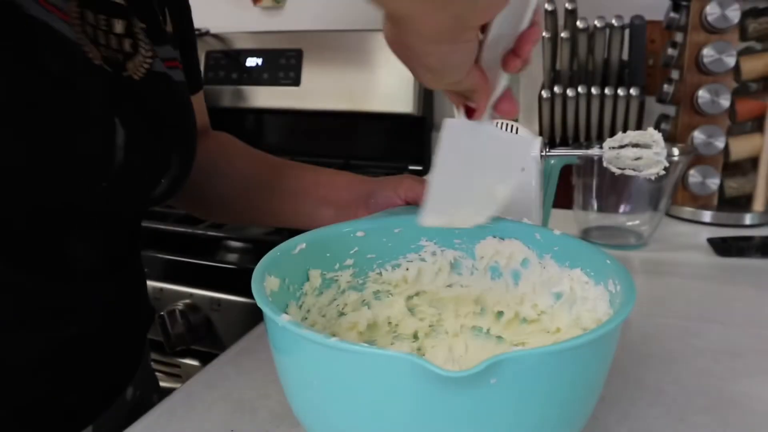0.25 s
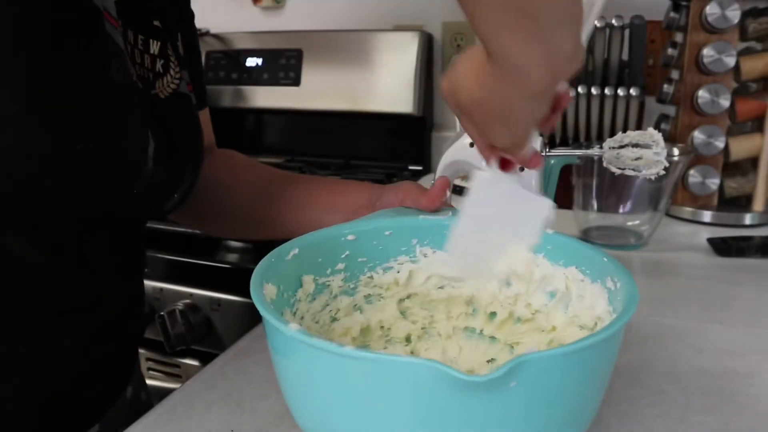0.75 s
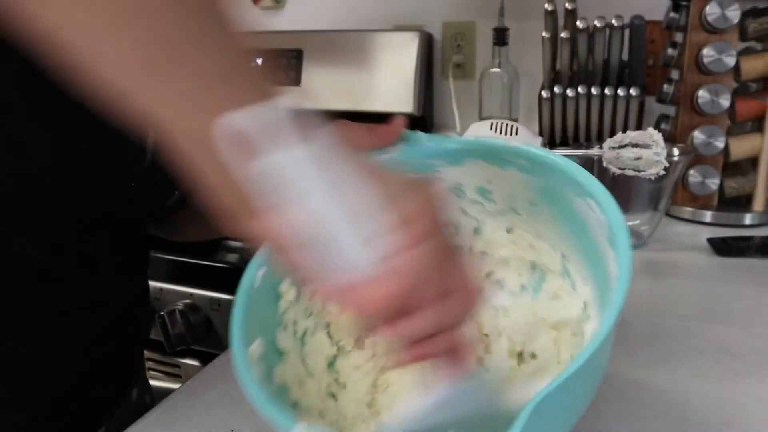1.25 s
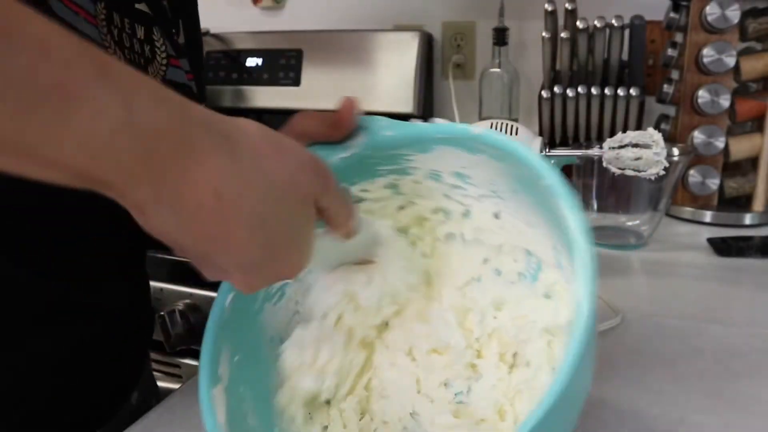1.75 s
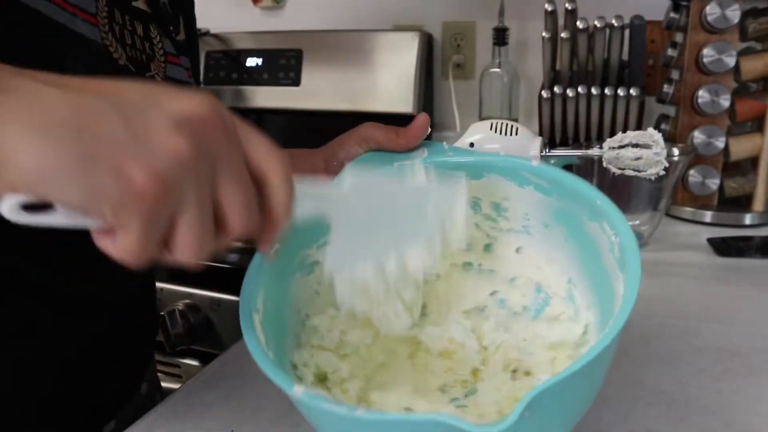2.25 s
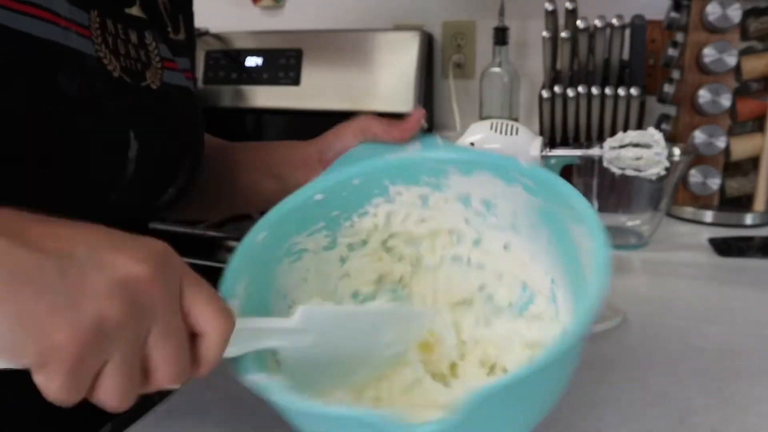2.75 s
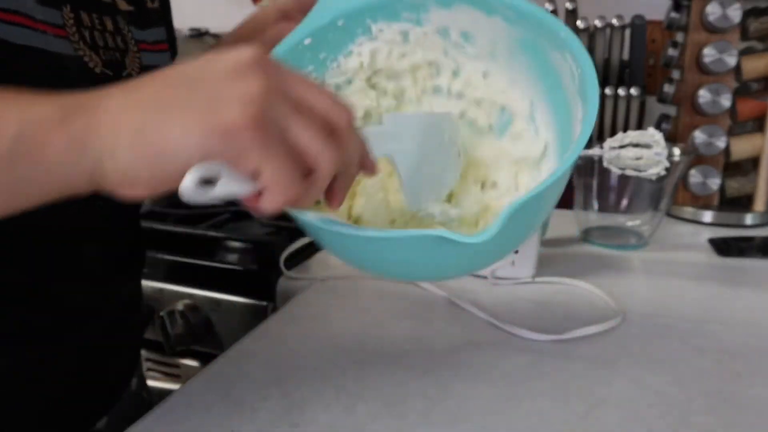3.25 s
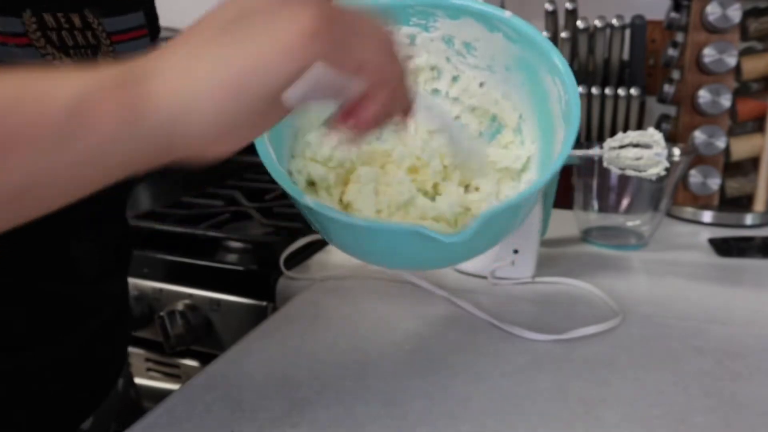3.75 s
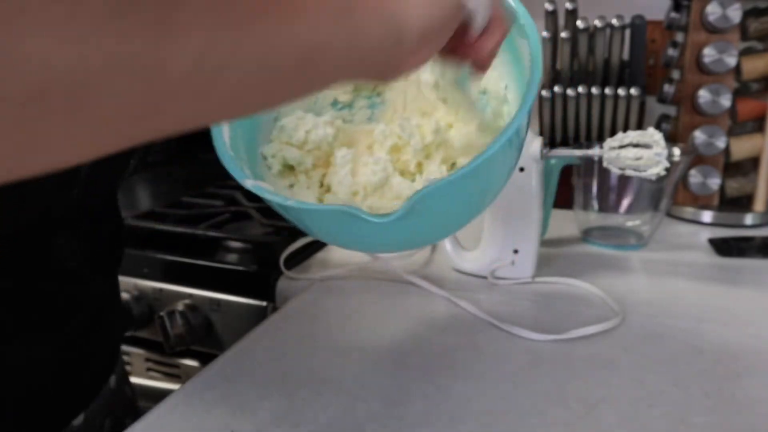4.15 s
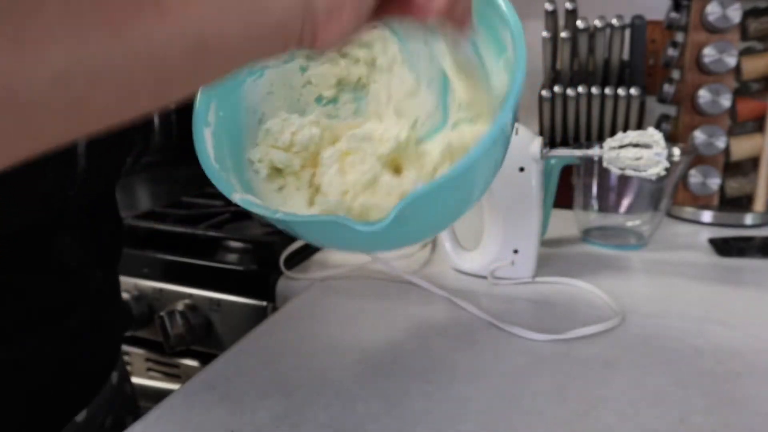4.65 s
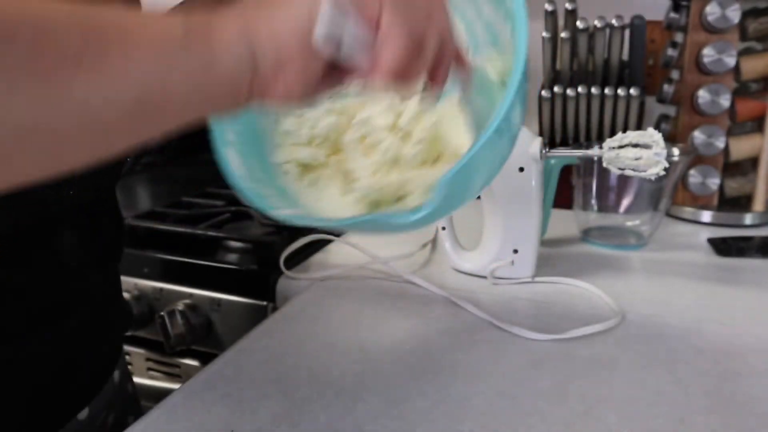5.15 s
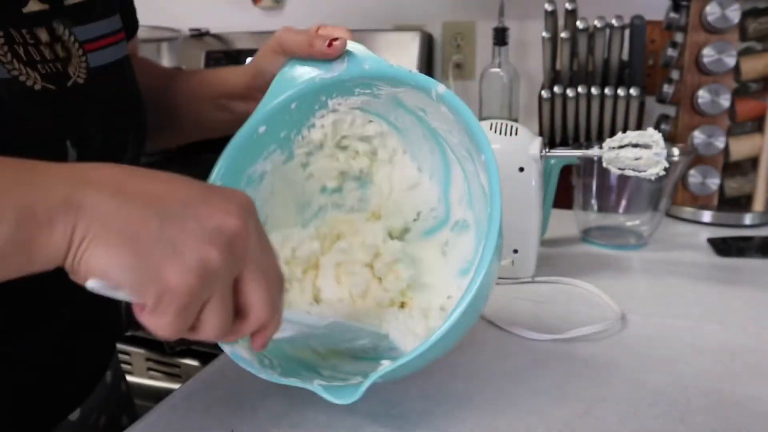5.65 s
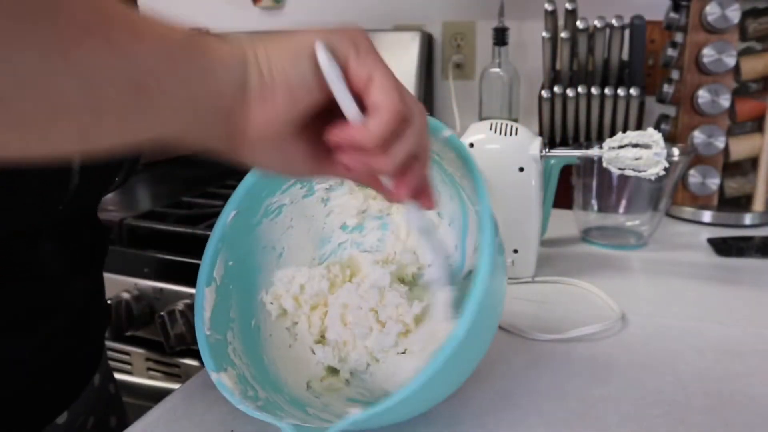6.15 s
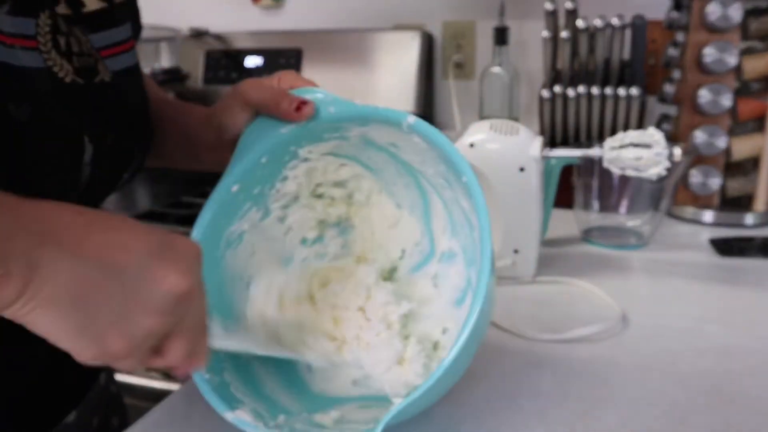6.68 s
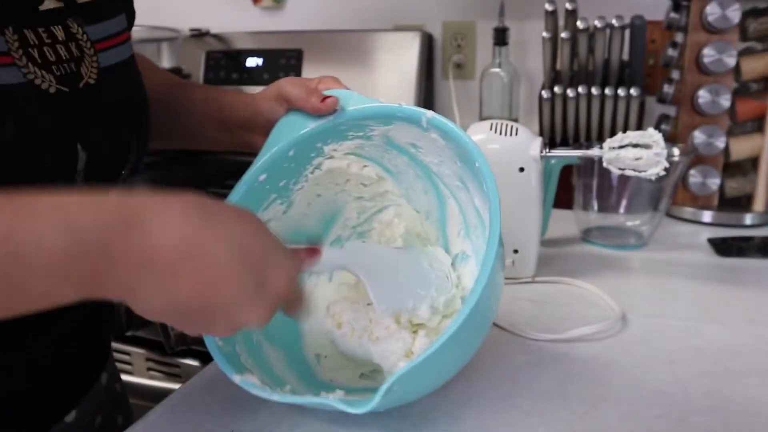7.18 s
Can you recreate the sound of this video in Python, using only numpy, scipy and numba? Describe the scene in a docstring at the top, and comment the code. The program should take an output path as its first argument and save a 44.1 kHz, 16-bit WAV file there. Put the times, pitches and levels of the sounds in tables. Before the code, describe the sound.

Close, lightly echoing kitchen sound, with a faint low appliance rush and wavering hum throughout. A soft bump opens it; at 0.5 s the spatula taps the plastic bowl. From 0.8 to 1.5 s a grainy, mid-pitched rasp sweeps the wall with wet frosting hiss, strongest near 1.4, while the base judders lowly on the counter around 1.2. Small pushes and light taps follow to 2.1. Two loud, hard rim raps clatter at 2.4 and 2.65, each with a thud; the background dips and creeps back. After a lull, taps at 3.9 and 4.5 frame short scrapes near 4.0 and 4.6 and soft, wet smears. A tap and lighter sweep run 5.0-5.5. At 5.8 the bowl thumps down with a tiny dry chirp. The strongest raspy scrape builds from 6.2, peaking 6.6-6.85 with firm knocks and low bumps, then fades into faint smearing by 7.4.

```python
"""In a small kitchen, close to a camera, a spatula works thick frosting round a plastic bowl.
The blade's stick-slip is random grains through gliding resonances, with wet hiss and a ringing bowl wall.
Taps on the wall and two raps on the rim mix noise bursts with ringing modes; the bowl drags, bumps and chirps.
An appliance rushes and hums behind, from shaped noise and wavering sine lines.
The camera's gain control ducks at the hard blows and creeps back."""
import sys
import numpy as np
from scipy import signal
from scipy.fft import rfft, irfft
from scipy.io import wavfile
from scipy.ndimage import uniform_filter1d
from numba import njit

SR = 44100
rng = np.random.default_rng(int(sys.argv[2]) if len(sys.argv) > 2 else 0)


def to_wav(s):
    """Save 16-bit WAV."""
    ch = np.atleast_2d(s).T  # columns
    pcm = np.round(np.clip(ch, -1, 1) * 32767)  # PCM
    wavfile.write(sys.argv[1], SR, pcm.astype(np.int16))


N = 327222
T = np.arange(N) / SR  # time [s]

# long sweeps of the blade round the wall, one curve each: (time [s], rub level [dB], rub centre [Hz])
SWEEPS = [
    [(0.78, -55, 2270), (0.794, -27.5, 2230), (0.89, -26, 2350), (0.976, -28, 2150), (1.06, -29.5, 1980),
     (1.17, -28, 1870), (1.21, -24, 2270), (1.275, -28, 2020), (1.322, -27.5, 2400), (1.345, -22, 2430),
     (1.4, -21.5, 2400), (1.442, -35.5, 2220), (1.494, -46.5, 2070), (1.56, -55, 2310)],
    [(4.98, -34, 2400), (4.995, -32, 2400), (5.075, -28.5, 2140), (5.112, -35, 1980), (5.192, -34, 1940),
     (5.226, -33.5, 1900), (5.302, -37.5, 1790), (5.316, -28, 1830), (5.354, -42, 1910), (5.418, -50, 2000),
     (5.448, -42, 2010), (5.56, -59, 1840)],
    [(6.14, -48.5, 1860), (6.29, -36, 2140), (6.37, -35, 1950), (6.435, -27.5, 2050), (6.46, -33, 1950),
     (6.525, -25, 1760), (6.566, -23.5, 2100), (6.588, -24.5, 2200), (6.606, -22, 2140),
     (6.67, -19.5, 2300), (6.718, -19, 2080), (6.748, -19.5, 2010), (6.776, -20.5, 2200),
     (6.802, -18.5, 2240), (6.846, -23.5, 2060), (6.864, -32.5, 2150), (6.938, -46, 1930),
     (6.974, -33, 2200), (6.992, -46, 2370), (7.08, -74, 2150)],
]
# wet hiss of the frosting in each sweep, before HISS_DB: (time [s], relative level [dB])
SMEARS = [
    [(0.775, -74), (0.793, -47.5), (0.823, -53.5), (0.903, -44.5), (1.049, -60.5), (1.159, -56),
     (1.209, -44), (1.257, -48.5), (1.385, -38), (1.469, -60.5), (1.56, -68)],
    [(4.97, -71), (4.978, -50), (5.024, -54.5), (5.078, -46), (5.096, -50.5), (5.16, -59), (5.3, -59.5),
     (5.32, -55), (5.36, -64), (5.532, -86), (5.56, -74)],
    [(6.17, -74), (6.22, -57), (6.338, -59), (6.6, -51.5), (6.676, -42), (6.73, -48.5), (6.834, -47.5),
     (6.878, -60.5), (6.98, -56), (6.988, -63), (7.08, -66)],
]
# short pushes through the frosting, hiss and wall against the rub:
# (peak time [s], rise [s], fade [s], rub level [dB], rub centre [Hz], hiss [dB], bowl wall [dB])
PUSHES = [(0.59, 0.24, 0.55, -49.5, 2100, -15.5, 2.5), (0.75, 0.071, 0.13, -47.5, 1950, -14, -9),
          (1.613, 0.11, 0.13, -40, 2400, -16, -7), (2.11, 0.3, 0.21, -58, 2177, -5.5, -12),
          (3.902, 0.004, 0.043, -38, 1980, -34, 15), (4.003, 0.07, 0.067, -20.5, 2190, -22, -19),
          (4.062, 0.056, 0.063, -25, 2230, -18, -6), (4.11, 0.1, 0.13, -40.5, 1800, -28, 10),
          (4.205, 0.071, 0.055, -36, 1550, -27, 4.5), (4.233, 0.08, 0.022, -31.5, 1940, -30, -5.5),
          (4.29, 0.34, 0.75, -64, 1840, -1.5, 8), (4.488, 0.0072, 0.029, -49, 2000, -25, 15),
          (4.596, 0.07, 0.074, -22, 2300, -16, -25), (4.711, 0.49, 0.14, -37.5, 1870, -23, 2.5),
          (6.214, 0.045, 0.081, -34, 1950, -27, -10), (6.975, 0.054, 0.018, -28, 2060, -25, -23.5),
          (7.359, 0.35, 0.28, -56.5, 2210, -10, -15)]
# resonances of the blade: (multiple of the rub centre [ratio], level [dB], width [Hz])
BLADE_MODES = [(1, 0, 414), (1.25, -0.75, 427), (1.47, -5.5, 654)]
# tone of the rasping edge: (frequency [Hz], level [dB])
RUB_TONE = [(300, -39.5), (700, -21), (950, 1.5), (1200, 9.5), (1500, 0.5), (1950, 1), (2400, -3),
            (2700, -1), (3300, -4.5), (4200, -8.5), (6000, -22), (12000, -55)]
# tone of the smearing frosting: (frequency [Hz], level [dB])
HISS_TONE = [(2500, -17), (4000, -3.5), (5400, -0.5), (7200, -4.5), (9200, -7), (11000, -21), (15000, -41)]
# frosting parts from the blade with a small smack: (time [s], level before its tone [dB])
SMACKS = [(1.595, -49), (2.13, -46), (4.843, -47), (4.891, -48), (5.323, -38), (6.976, -44)]
# tone of the smacks: (frequency [Hz], level [dB])
SMACK_TONE = [(1500, 13), (4000, -2), (9500, 0), (14000, -17)]
# the blade taps the wall; the row at 5.8228 s is the click of the bowl set down on the counter: # (time [s],
# force [dB], ringing centre [Hz], ringing width [Hz], bowl ring [dB], crack [dB])
TAPS = [(0.4785, -9.5, 1770, 2600, -11.5, -11), (0.579, -35, 2520, 900, 4, -3),
        (0.789, -24, 2400, 2000, 1, -20), (1.245, -16.5, 2200, 1200, 2, -21),
        (1.627, -26.5, 1300, 500, 8.5, -25), (1.9932, -28.5, 2130, 3010, -1.5, -6),
        (3.8990, -9, 2200, 1900, -3, -36), (4.237, -18, 1430, 900, -1, -26),
        (4.278, -43, 2500, 1510, -4, 3), (4.4841, -6.5, 1920, 2000, -4, -8.5),
        (4.4870, -10, 2480, 900, -7, -20), (4.557, -18, 2400, 900, 5, -30),
        (4.9793, -11.5, 2370, 700, 2, -11), (5.3125, -16, 1880, 890, 2.5, -12),
        (5.8228, -18.5, 1520, 3000, 5.5, -15), (6.142, -30, 1620, 2000, 0, -27),
        (6.282, -19, 2100, 1010, 4, -25), (6.623, -8, 2150, 500, -7, -28), (6.7171, -5, 1730, 500, -5, -27),
        (6.7998, -3.5, 2650, 700, -3, -36)]
# tone of the whole tap: (frequency [Hz], level [dB])
TAP_TONE = [(100, 10.5), (3500, 2.5), (5000, -11), (9500, -9.5), (11500, -26), (15000, -44)]
# ring of the loaded bowl: (frequency [Hz], level [dB], t60 [s])
BOWL_MODES = [(144, -9.5, 0.068), (246, -25.5, 0.18), (323.5, -16, 0.21), (367, -12.5, 0.11),
              (534, 2, 0.02), (616, 3.5, 0.034), (654, 3.5, 0.013), (890, 3.5, 0.009), (1163, 1.5, 0.067),
              (1193, -1, 0.073), (1650, -17.5, 0.051), (1723, -0.5, 0.06), (1853, -1.5, 0.18),
              (1980, -5, 0.024), (2150, 2, 0.03), (2400, -2.5, 0.018), (2560, 10, 0.038), (2980, 1, 0.048),
              (3070, -13, 0.025), (3450, -2, 0.078), (3810, 8, 0.037), (4280, -28, 0.0066),
              (5000, -22.5, .007), (5700, -56, .006)]
# the spatula is rapped on the rim:
# (time [s], force [dB], clatter decay to 1/e [s], handle's note [Hz], handle level [dB])
RAPS = [(2.3871, 1, 0.0043, 1910, -13), (2.6534, 3.5, 0.0043, 2913, -2)]
# tone of the rap's clatter: (frequency [Hz], level [dB])
CLATTER_TONE = [(100, 0.5), (370, 13), (900, 10), (1400, 7.5), (2300, 11), (3500, 0.5), (4500, -7),
                (6300, -12), (9500, -20), (11500, -33), (15000, -41)]
# ring of the rim: (frequency [Hz], level [dB], t60 [s])
RIM_MODES = [(524.6, 0, 0.035), (600, 0, 0.044), (749, -7.5, 0.055), (923, -7.5, 0.049),
             (1133, -1.5, 0.029), (1187, -1, 0.05), (1414, -14, 0.037), (1640, -12.5, 0.039),
             (1980, -10.5, 0.032), (2200, -15.5, 0.042), (2405, -16.5, 0.022), (2775, -13.5, 0.03),
             (3430, -25, 0.03)]
# the bowl's base dragged over the counter: (time [s], relative level [dB])
DRAG = [(0.98, -50), (1.055, -32), (1.11, -27), (1.178, -23), (1.256, -34), (1.46, -51)]
# the bowl meets the counter: (time [s], force [dB], low-pass corner of the thud [Hz])
BUMPS = [(0.004, -20, 340), (0.479, -29, 900), (2.3888, -4.5, 445), (2.6564, -4.5, 420), (5.8225, -1, 600),
         (6.142, -25, 900), (6.52, -11, 376), (6.718, -13.5, 484), (6.834, -24, 910), (6.881, -19.5, 460)]
# boom of bowl and counter together: (frequency [Hz], level [dB], t60 [s])
COUNTER_MODES = [(69.6, -2.5, 0.19), (145.1, 7.5, 0.077), (164.6, 2, 0.11), (238, -0.5, 0.067),
                 (280, -10.5, 0.13), (328, -5.5, 0.067), (427.5, -6.5, 0.043), (500, 5, 0.018),
                 (736, -33, 0.058)]
# the base chirps as it settles: (time [s], relative level [dB], lower note [Hz])
CHIRPS = [(5.8464, -18.5, 4500), (5.8603, -14.5, 4200)]
# width between the two microphones: (frequency [Hz], side minus mid [dB])
WIDTH = [(60, -32.5), (200, -24.5), (500, -15.5), (2000, -13.5), (2900, -9), (4000, 2), (12000, 2.5)]
# tone of the kitchen echo: (frequency [Hz], level [dB])
ROOM_TONE = [(50, 4.5), (150, -5.5), (600, -3.5), (1200, -2.5), (2400, -3.5), (3900, 1), (5200, -4),
             (7000, -14), (10000, -8)]
# decay of the kitchen echo: (frequency [Hz], t60 [s])
ROOM_T60 = [(125, 0.28), (1000, 0.42), (2500, 0.54), (6000, 0.33), (10000, 0.24)]
# tone of the appliance's rush: (frequency [Hz], level [dB])
RUSH_TONE = [(15, -43.5), (25, -22.5), (54, -4.5), (87, -12), (151, -6.5), (187, -6.5), (326, -7.5),
             (425, -13.5), (569, -7), (649, -16), (1020, -17), (1100, -18), (1970, -21.5), (9170, -54),
             (14000, -65)]
# width of the rush: (frequency [Hz], side minus mid [dB])
RUSH_WIDTH = [(100, -21.5), (600, -10.0), (2000, -6.0), (5000, 7.0)]
# appliance hum lines: (mean frequency [Hz], mean rms level [dB])
HUM = [(59.6, -49.5), (119, -51.5), (145.3, -46.5), (161.5, -49), (274.5, -55.5), (535, -54), (586.8, -53),
       (1055, -62)]

HISS_DB, EDGE_DB = 1, 1.1  # trims of the sweeps' hiss and of the whole edge rasp
FIRM_DB = -25  # rub level of a firm, steady sweep
WALL_DB, WALL_DB_PER_DB = -41, 0.24  # the wall rings almost as much under a light sweep as under a firm one
PUSH_DROP_DB = 23.5  # a push rises and fades by this much in its rise and fade times
STEADY, STEADY_S = 0.37, 0.012  # even hand: share of the chance dB swings taken out, window [s]
FLUTTER_DB, FLUTTER_S = -12, 0.0092  # the blade chatters briefly where it lands: level, decay to 1/e [s]
SOFT_TOP = 1.3  # the soft blade stirs the bowl only up to this multiple of its own note
PING, PING_S = 0.48, 0.002  # the blade's own note in a tap: strength, decay to 1/e [s]
HANDLE_T60_S = 0.017
RAP_RISE_S = 0.00034  # the clatter builds as the rim gives way
TAP_ROOM_DB, STIR_ROOM_DB = -5.5, -12  # how much of each reaches the room, against a hard knock
CHIRP_ROOM_DB = -16  # the bowl covers its own base
RUSH_DB = -41.0
TOP_HZ = 15100  # upper edge of the finished sound


def undb(db):
    """Decibels to gain."""
    return 10 ** (np.asarray(db) / 20)


def unit(x):
    """Scale to rms 1."""
    return x / np.sqrt(np.mean(x ** 2))


def lookup(points, hz):
    """Read (frequency [Hz], value) points on a log-frequency axis."""
    f, v = np.transpose(points)
    return np.interp(np.log(np.maximum(hz, 1)), np.log(f), v)


def colour(x, points):
    """Shape a sound by a tone table; the minimum-phase filter keeps attacks sharp."""
    size = 8192
    log_gain = np.log(undb(lookup(points, np.fft.rfftfreq(size, 1 / SR))))
    # folding the cepstrum onto positive time makes the filter causal
    cepstrum = irfft(log_gain)[:size // 2]
    cepstrum[1:] *= 2
    response = irfft(np.exp(rfft(cepstrum, size)))
    if x.ndim > 1:
        response = response[None]
    return signal.oaconvolve(x, response, axes=-1)[..., :x.shape[-1]]


def cut(x, hz, kind, order=2):
    """Low-pass or high-pass."""
    sos = signal.butter(order, min(hz, SR / 2 - 1000), kind, fs=SR, output="sos")
    return signal.sosfilt(sos, x)


def walk(rate):
    """Slow chance of rms 1, with a new target `rate` times a second."""
    k = int(SR / rate)
    steps = np.repeat(rng.standard_normal(N // k + 1), k)
    return unit(uniform_filter1d(uniform_filter1d(steps, k), k)[:N])


def add(track, s, sound):
    """Mix a sound in at a time [s]."""
    i = max(int(s * SR), 0)
    track[i:i + len(sound)] += sound[:N - i]


def ring(modes):
    """Impulse response of a mode table; neighbours swing in opposite directions."""
    t = T[:SR // 2]
    out = np.zeros(len(t))
    for k, (hz, db, t60) in enumerate(modes):
        out += (-1) ** k * undb(db - 60 * t / t60) * np.sin(2 * np.pi * hz * t)
    return out


def through(x, response):
    """Play a sound through an impulse response."""
    return signal.oaconvolve(x, response)[:N]


def slips(rate, spread_db):
    """Random tiny releases, `rate` a second on average, a few much larger than the rest."""
    size = undb(spread_db * np.minimum(rng.exponential(size=N), 4))
    return unit((rng.random(N) < rate / SR) * size * rng.standard_normal(N))


def follow(tables, column):
    """One column of curve tables, sample by sample."""
    rows = np.vstack(tables)
    return np.interp(T, rows[:, 0], rows[:, column])


def during(tables):
    """1 while a curve table lasts, with soft edges."""
    active = sum(1. * (T > rows[0][0]) * (T < rows[-1][0]) for rows in tables)
    return uniform_filter1d(active, SR // 300)


def steady(x, window_s):
    """Even out slow chance swells and leave the fine grit."""
    power = uniform_filter1d(x ** 2, int(window_s * SR))
    return unit(x / np.maximum(power, 1e-9) ** (STEADY / 2))


def stereo(mid, side):
    """Left and right from mid and side."""
    return np.array([mid + side, mid - side])


@njit
def resonate(x, hz, width):
    """Band-pass with a moving centre, as a two-state filter."""
    y, band, low = np.empty(len(x)), 0., 0.
    for i in range(len(x)):
        g, k = np.tan(np.pi * hz[i] / SR), width / hz[i]
        v = (band + g * (x[i] - low)) / (1 + g * (g + k))
        band, low, y[i] = 2 * v - band, low + 2 * g * v, k * v
    return y


def scrape():
    """The blade sticks and slips: its edge rasps, the wall rings along and the frosting hisses as it smears."""
    sweep, sweep_hz = sweeps()
    push, push_hz = pushes()
    rub_gain, hiss_gain, wall_gain = np.hypot(sweep, push)
    push_share = (push[0] / rub_gain) ** 2
    centre_hz = sweep_hz + (push_hz - sweep_hz) * push_share
    grip = undb(1.1 * walk(180))
    friction = slips(rate=3800, spread_db=1.3) * grip
    smear = slips(rate=6000, spread_db=1.8) * grip
    # the resonances glide together as the blade bends
    bent_hz = np.clip(centre_hz * (1 + .025 * walk(40)), 500, 6000)
    blade = np.zeros(N)
    for k, (multiple, db, width_hz) in enumerate(BLADE_MODES):
        blade += (-1) ** k * undb(db) * resonate(friction, multiple * bent_hz, 1. * width_hz)
    edge = colour(blade, RUB_TONE)
    # the far wall of the bowl reflects the rasp over a path that changes as the blade travels
    lag_s = 0.002212 + 0.000486 * walk(5)
    edge = steady(edge + 0.48 * np.interp(T - lag_s, T, edge), STEADY_S)
    wall = cut(through(friction, ring(BOWL_MODES)), 344, "high", order=3)
    wall = unit(cut(wall, 794, "low", order=5))
    hiss = unit(colour(smear, HISS_TONE))
    return undb(EDGE_DB) * rub_gain * edge + wall_gain * wall + hiss_gain * hiss


def sweeps():
    """Gains of rub, hiss and wall in the long sweeps, and the rub's centre [Hz]."""
    rub_db, centre_hz = follow(SWEEPS, column=1), follow(SWEEPS, column=2)
    hiss_db = HISS_DB + follow(SMEARS, column=1)
    wall_db = WALL_DB + WALL_DB_PER_DB * (rub_db - FIRM_DB)
    return undb([rub_db, hiss_db, wall_db]) * during(SWEEPS), centre_hz


def pushes():
    """Gains of rub, hiss and wall in the short pushes, and the rub's centre [Hz]; each swells and dies away."""
    power, weighted_hz = 0, 0
    for s, rise_s, fade_s, db, hz, hiss_db, wall_db in PUSHES:
        distance = np.maximum((s - T) / rise_s, (T - s) / fade_s)
        swell = undb(db - PUSH_DROP_DB * np.minimum(distance, 10))
        power = power + np.outer(undb([0, hiss_db, wall_db]), swell) ** 2
        weighted_hz = weighted_hz + hz * swell ** 2
    return np.sqrt(power), weighted_hz / power[0]


def smacks():
    """Tiny wet clicks as the frosting lets go: noise bursts that die in milliseconds."""
    out, t = np.zeros(N), T[:SR // 50]
    for s, db in SMACKS:
        add(out, s, undb(db) * rng.standard_normal(len(t)) * np.exp(-t / 0.002))
    return colour(out, SMACK_TONE)


def taps():
    """A short crack, the blade's ping and the bowl's ring; the spot struck decides which modes speak."""
    out, bowl = np.zeros(N), ring(BOWL_MODES)
    t = T[:len(bowl)]
    # the blade stays pressed on the wall and soaks up much of the ring
    damping = 0.29 + 0.19 * np.exp(-t / 0.0069)
    for s, db, hz, width_hz, ring_db, crack_db in TAPS:
        flutter, crack = rng.standard_normal((2, len(t)))
        flutter *= undb(FLUTTER_DB) * np.exp(-t / FLUTTER_S)
        crack *= np.exp(-t / 0.002)
        body = resonate(0.26 * bowl * damping + flutter, np.full(len(t), 1. * hz), 1. * width_hz)
        body = cut(body, SOFT_TOP * hz, "low", order=4)
        ping = PING * np.sin(2 * np.pi * hz * t) * np.exp(-t / PING_S)
        add(out, s, undb(db) * (undb(ring_db) * body + ping + undb(crack_db) * crack))
    return colour(out, TAP_TONE)


def raps():
    """Handle and rim clatter and ring: the sound at the camera, and the smoother sum that fills the room."""
    near, around, t = np.zeros(N), np.zeros(N), T[:SR // 2]
    rim = ring(RIM_MODES)
    for s, db, clatter_s, handle_hz, handle_db in RAPS:
        envelope = np.exp(-t / clatter_s) * (1 - np.exp(-t / RAP_RISE_S))
        clatter = rng.standard_normal(len(t)) * envelope
        # the sum of all directions is one click with the clatter's energy
        click = np.linalg.norm(clatter) * (t == 0)
        handle = ring([(handle_hz, handle_db, HANDLE_T60_S)])
        add(near, s, undb(db) * (colour(clatter, CLATTER_TONE) + rim + handle))
        add(around, s, undb(db) * (colour(click, CLATTER_TONE) + rim))
    return near, around


def counter():
    """The heavy bowl judders over the counter as slips through its boom, and thuds as boom and slap."""
    boom = ring(COUNTER_MODES)
    t = T[:len(boom)]
    judder = cut(through(slips(rate=400, spread_db=1.5), boom), 200, "low")
    drag_gain = undb(follow([DRAG], column=1) - 3.5) * during([DRAG])
    out = steady(judder, window_s=0.05) * drag_gain
    for s, db, high_hz in BUMPS:
        slap = rng.standard_normal(len(t)) * np.exp(-t / 0.007)
        add(out, s, undb(db) * cut(0.57 * boom + 2.05 * slap, high_hz, "low", order=3))
    return cut(out, 44, "high", order=3)


def chirps():
    """The base grabs and lets go: a dry click with a brief two-note squeak in it."""
    out, t = np.zeros(N), T[:SR // 20]
    swell = t / 0.00055 * np.exp(1 - t / 0.00055)  # peaks at 0.55 ms
    for s, db, hz in CHIRPS:
        snap = cut(rng.standard_normal(len(t)), 4800, "low", order=7)
        squeak = np.sin(2 * np.pi * hz * t) + 0.76 * np.sin(2 * np.pi * 1.11 * hz * t)
        add(out, s, undb(db) * (0.18 * squeak + 2.1 * snap) * swell)
    return out


def microphones(x):
    """Counter and cupboards scatter mostly the treble apart, in ways that change as the bowl moves."""
    t = T[:SR // 50]
    paths = rng.standard_normal((2, len(t))) * t * np.exp(-t / 0.0007)
    one, other = (through(x, path / np.linalg.norm(path)) for path in paths)
    angle = 1.3 * walk(1.506)  # radians; blends the two scattered paths
    return stereo(x, colour(one * np.cos(angle) + other * np.sin(angle), WIDTH))


def kitchen(x):
    """The room rings briefly, longest near 2.5 kHz; its bass is nearly alike left and right."""
    t = T[:SR // 2]
    noise = rfft(rng.standard_normal((2, len(t))))
    octave = np.log2(np.fft.rfftfreq(len(t), 1 / SR) + 1)
    tail = 0
    for k in np.arange(5, 15):  # overlapping octave bands, each with its own decay
        band = irfft(noise * np.maximum(1 - np.abs(octave - k), 0), len(t))
        tail = tail + band * np.exp(-np.log(1000) * t / lookup(ROOM_T60, 2. ** k))
    onset = np.clip(t / 0.00077 - .4, 0, 1)
    tail = colour(tail, ROOM_TONE) * onset * undb(-31.0)
    side_tail = cut(tail[1], 900, "high", order=1)
    return stereo(through(x, tail[0]), 0.5 * through(x, side_tail))


def appliance():
    """A fan's rush of shaped noise, with motor and mains lines that waver in pitch and level."""
    mid, side = (unit(colour(rng.standard_normal(N), RUSH_TONE)) for _ in range(2))
    rush = stereo(mid, colour(side, RUSH_WIDTH)) * undb(RUSH_DB + 1.2 * walk(54))
    hum = np.zeros(N)
    for hz, db in HUM:
        level = np.sqrt(2) * undb(db + 1.0 * walk(5.5))
        phase = 2 * np.pi * np.cumsum(hz + 1.198 * walk(9)) / SR
        hum += level * np.sin(phase)
    return rush + hum


def scene():
    """The open bowl beams the stirring at the camera; hard knocks fill the whole kitchen."""
    stirring = scrape() + smacks()
    tapping, chirping, thuds = taps(), chirps(), counter()
    raps_near, raps_around = raps()
    to_room = raps_around + thuds + undb(TAP_ROOM_DB) * tapping
    to_room += undb(STIR_ROOM_DB) * stirring + undb(CHIRP_ROOM_DB) * chirping
    direct = stirring + tapping + chirping + thuds + raps_near
    return microphones(direct) + kitchen(to_room) + appliance()


@njit
def ducking(x, limit, hold, fall, rise):
    """Gain that falls at a fixed rate while held output peaks are over the limit, else creeps back to 1."""
    y, peak, gain = np.empty(len(x)), 0., 1.
    for i in range(len(x)):
        peak = max(min(x[i] * gain, 1.), peak * hold)
        gain = gain * fall if peak > limit else min(gain * rise, 1.)
        y[i] = gain
    return y


def record(dry, limit_db=-5, duck_db_per_s=850):
    """Gain control ducks after loud peaks and recovers slowly; what still exceeds full scale clips."""
    hold = np.exp(-1 / (0.0082 * SR))  # peak memory of 8.2 ms
    fall = float(undb(-duck_db_per_s / SR))
    rise = float(undb(8.5 / SR))  # recovers 8.5 dB a second
    gain = ducking(np.abs(dry).max(axis=0), float(undb(limit_db)), hold, fall, rise)
    clipped = np.clip(dry * gain, -1, 1)
    return signal.sosfilt(signal.ellip(10, .2, 80, TOP_HZ, fs=SR, output="sos"), clipped)


dry = scene()
out = record(dry)
to_wav(out)
```